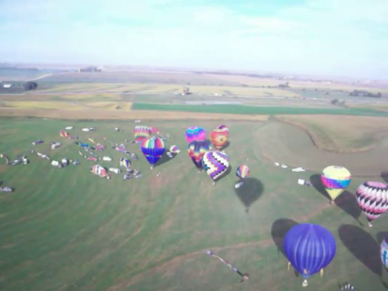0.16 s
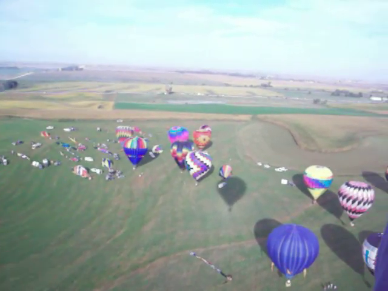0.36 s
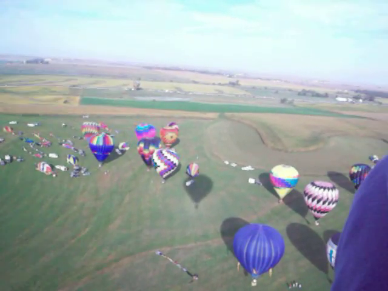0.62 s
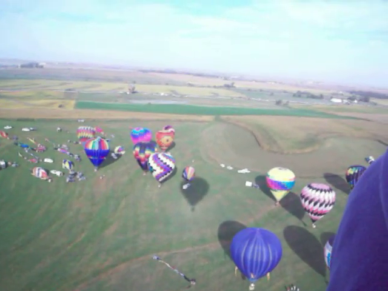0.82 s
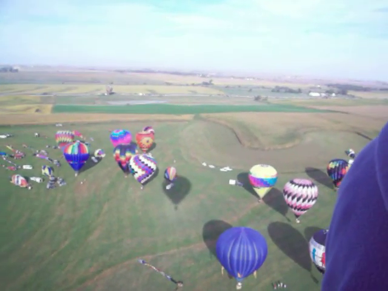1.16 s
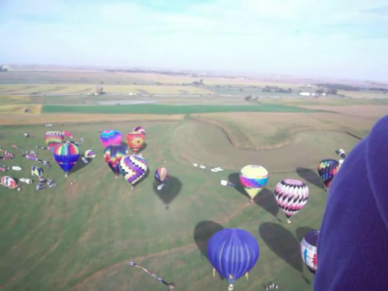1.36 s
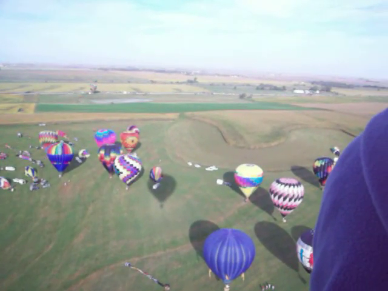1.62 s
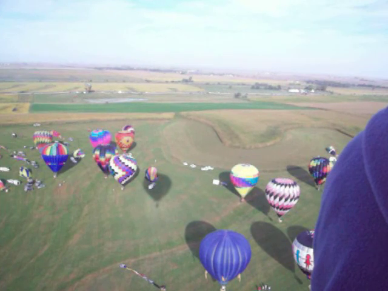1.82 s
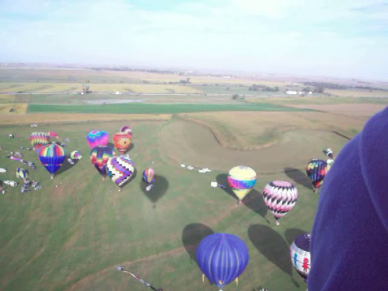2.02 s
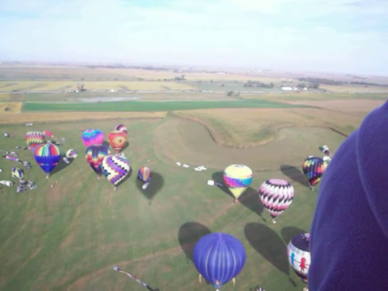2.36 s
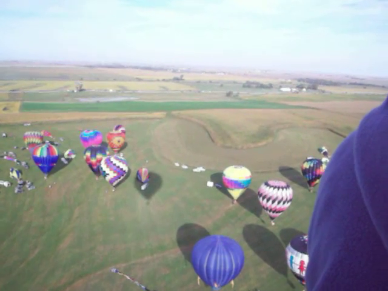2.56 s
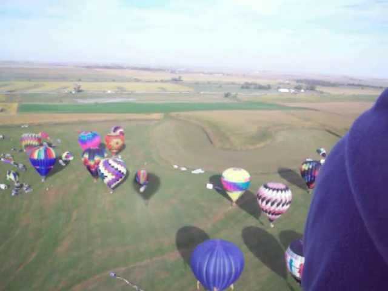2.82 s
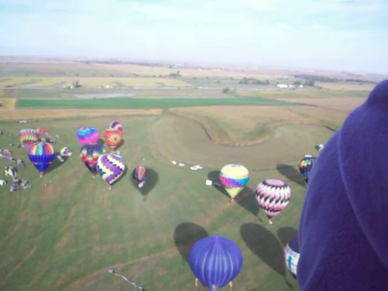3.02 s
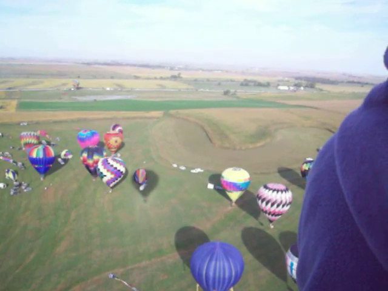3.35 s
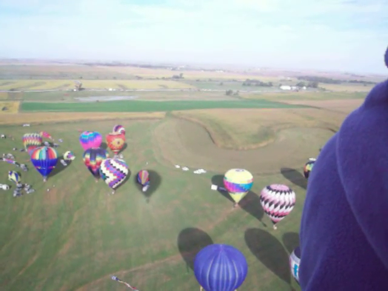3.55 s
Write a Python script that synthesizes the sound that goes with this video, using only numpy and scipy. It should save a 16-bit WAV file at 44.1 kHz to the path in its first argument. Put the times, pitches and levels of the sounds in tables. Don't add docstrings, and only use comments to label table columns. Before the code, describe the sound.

Close, loud burner flame roars from start to end, hissing and fluttering; sharp thuds of pressure break in, denser in the last part, each briefly ducking the roar on a cheap, limiting microphone in the basket.

```python
import sys
import numpy as np
from scipy import signal
from scipy.fft import rfft, irfft
from scipy.io import wavfile

SR = 44100
rng = np.random.default_rng(int(sys.argv[2]) if len(sys.argv) > 2 else 0)


def makeup_ratio(level_db):
    decades = np.asarray(level_db, float) / 20
    return 10 ** decades


def master(y):
    cut = np.clip(np.atleast_2d(y).T, -1, 1)
    pcm = np.round(cut * 32767)
    wavfile.write(sys.argv[1], SR, pcm.astype(np.int16))


N = 163170
t = np.arange(N) / SR


def rms_one(x):
    return x / np.sqrt(np.mean(x ** 2) + 1e-20)


def drift(rate_hz):
    r = np.exp(-2 * np.pi * rate_hz / SR)
    wander = signal.lfilter([1], [1, -2 * r, r * r], rng.standard_normal(N + SR))
    return rms_one(wander[SR:])


def turbulence(spectrum, shared_db, patchy_db, rate_hz):
    hz = np.fft.rfftfreq(N, 1 / SR) + 1
    point_hz, point_db = np.transpose(spectrum)
    shape_db = np.interp(np.log(hz), np.log(point_hz), point_db, right=-90)
    noise = rfft(rng.standard_normal(N)) * makeup_ratio(shape_db)
    together = shared_db * drift(rate_hz)
    lowest = np.floor(2 * np.log2(point_hz[0])) - 1
    highest = 2 * np.log2(point_hz[-1]) + 1
    out = 0
    for half_octave in np.arange(lowest, highest):
        band = np.clip(1 - abs(2 * np.log2(hz) - half_octave), 0, 1)
        flicker_db = together + patchy_db * drift(rate_hz / 2)
        out = out + irfft(noise * band, N) * makeup_ratio(flicker_db)
    return rms_one(out)


def flame_rumble():
    # f/Hz, level/dB per Hz
    rumble_spectrum = [(14, -33), (28, -6), (42, 1), (90, -2), (160, 0.5), (330, -5.5), (600, -15.5),
                       (1100, -24.5)]
    return makeup_ratio(-8) * turbulence(rumble_spectrum, shared_db=1.06, patchy_db=0.4, rate_hz=24.0)


def jet_hiss():
    # f/Hz, level/dB per Hz
    hiss_spectrum = [(300, -22), (800, -6), (1500, -4.5), (2300, -6), (3300, -4.5), (5200, -13),
                     (5850, -26), (6300, -43)]
    # t/s, level/dB
    gas_flow = [(0, 0.5), (.2, 1.4), (.3, 0.5), (.4, 0.5), (0.511, -1), (.65, 0.7), (.8, 1.5), (.95, -0.3),
                (1.3, 1.5), (1.48, 1.4), (1.6, 0.8), (2.0, -0.2), (2.502, 0.8), (2.9, -1.6), (3.2, -0.3),
                (3.35, -2.6), (3.45, -0.3), (3.7, 1.5)]
    flow_db = np.interp(t, *np.transpose(gas_flow))
    hiss = turbulence(hiss_spectrum, shared_db=1.14, patchy_db=0.75, rate_hz=21.0)
    return makeup_ratio(-15.5 + flow_db) * hiss


def basket(x):
    # f/Hz, width/Hz, level/dB
    resonances = [(209.7, 25, -6.5), (569, 55, 6), (664, 59, -6), (834, 172, 5), (1067, 100, -4),
                  (1283, 75, 3), (1455, 100, -4.5), (1870, 85, 1), (2238, 200, -4), (2670, 89, 2.5),
                  (2820, 120, -5.5), (2980, 200, 3.5), (3500, 250, 2.5), (4723, 215, -1)]
    for hz, width_hz, db in resonances:
        w = 2 * np.pi * hz / SR
        a = makeup_ratio(db / 2)
        k = np.sin(w) * width_hz / hz / 2
        top = [1 + k * a, -2 * np.cos(w), 1 - k * a]
        bottom = [1 + k / a, -2 * np.cos(w), 1 - k / a]
        x = signal.lfilter(top, bottom, x)
    return x


def pressure_puffs():
    # t/s, sign of pressure, level/dB, width/ms
    puff_events = [(0.3208, -1, -13, 0.41), (0.4786, -1, 1.5, 1.2), (0.9156, -1, -4, 0.37),
                   (0.9833, -1, 8, 0.38), (1.4264, -1, 10, 0.67), (1.5355, 1, -1, 1.7),
                   (1.8342, -1, 3.5, 0.68), (2.1419, -1, 8, 0.5), (2.2149, -1, 11, 0.59),
                   (2.4667, -1, 5, 0.37), (2.7527, -1, 1, 0.86), (2.8714, 1, -4, 0.86),
                   (2.9316, 1, 7, 0.59), (2.971, 1, 7.5, 0.9), (3.1263, -1, 3.5, 0.45),
                   (3.2248, 1, 10, 0.61), (3.276, -1, -4, 0.54), (3.3166, -1, 7, .7), (2.306, -1, 1, 1.5),
                   (2.2053, 1, -2, 1.1), (3.3854, 1, -7, 1.7), (3.3885, -1, 6.5, 2.2)]
    out = np.zeros(N)
    for s, sign, db, width_ms in puff_events:
        centre = int(s * SR)
        near = slice(centre - 1500, centre + 1500)
        u = (t[near] - s) / width_ms * 1e3
        swing = np.exp(-u ** 2 / 2)
        rebound = 0.32 * np.exp(-u ** 2 / 32)
        out[near] += np.sign(sign) * makeup_ratio(db) * (swing - rebound)
    return out


def scene():
    rumble = basket(flame_rumble())
    hiss = basket(jet_hiss())
    puffs = pressure_puffs()
    smothered = rumble * np.exp(-2.5 * abs(puffs))
    return (smothered + hiss + puffs)[None]


def limiter(x):
    threshold_db, attack_s, release_db_per_s, makeup_db = -10, 0.0019, 592, 0.5
    over_db = np.maximum(20 * np.log10(abs(x) + 1e-9) - threshold_db, 0)
    climb_db = release_db_per_s * t
    held_db = np.maximum.accumulate(over_db + climb_db) - climb_db
    r = np.exp(-1 / (attack_s * SR))
    reduction_db = signal.lfilter([1 - r], [1, -r], held_db)
    return x * makeup_ratio(makeup_db - reduction_db)


def overload(x, ceiling):
    # t/s, level/dB
    ticks = [
        (.3192, -33),
        (1.8337, -36),
        (3.3162, -31),
    ]
    wrap_s, wrap_length_s, wrap_soft_s = 3.22472, 0.000165, 0.00008
    out = x.copy()
    for s, db in ticks:
        out[int(s * SR)] += makeup_ratio(db)
    flip = np.clip((wrap_length_s / 2 - abs(t - wrap_s)) / wrap_soft_s + 0.5, 0, 1)
    return out * (1 - flip) - ceiling * flip


def band_limit(x):
    return signal.sosfilt(signal.butter(12, 15850, fs=SR, output="sos"), x)


def record(dry):
    ceiling = 0.71
    x = limiter(dry[0])
    x = x / (1 + abs(x / ceiling) ** 10) ** (1 / 10)
    top_cut = signal.cheby2(10, 50, 7150, fs=SR, output="sos")
    x = signal.sosfiltfilt(top_cut, x)
    mix = overload(x, ceiling)[None]
    return band_limit(mix)


dry = scene()
out = record(dry)
master(out)
```